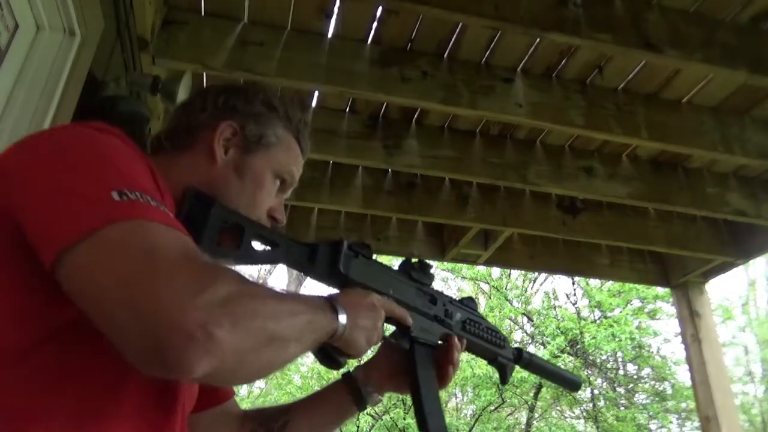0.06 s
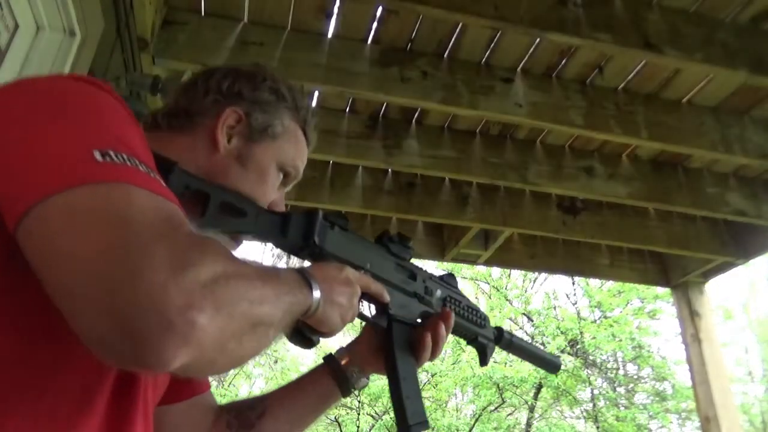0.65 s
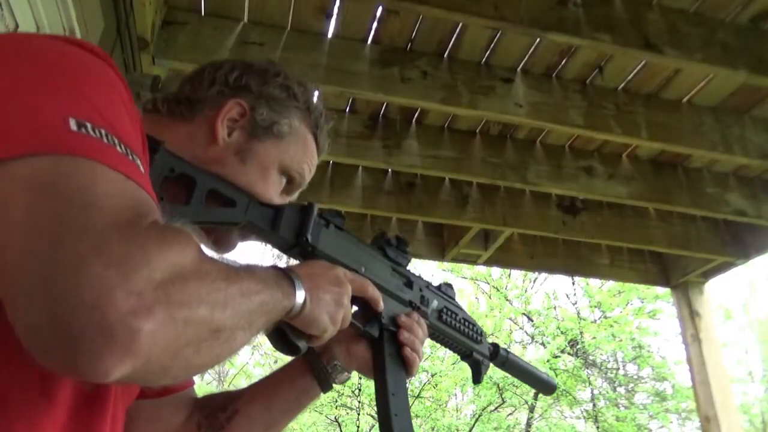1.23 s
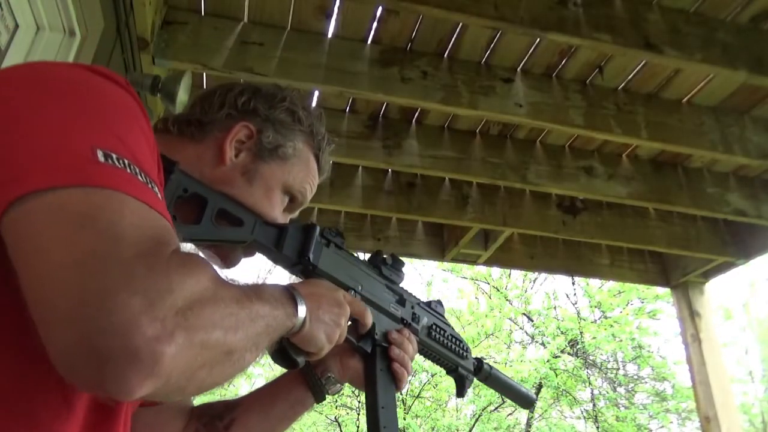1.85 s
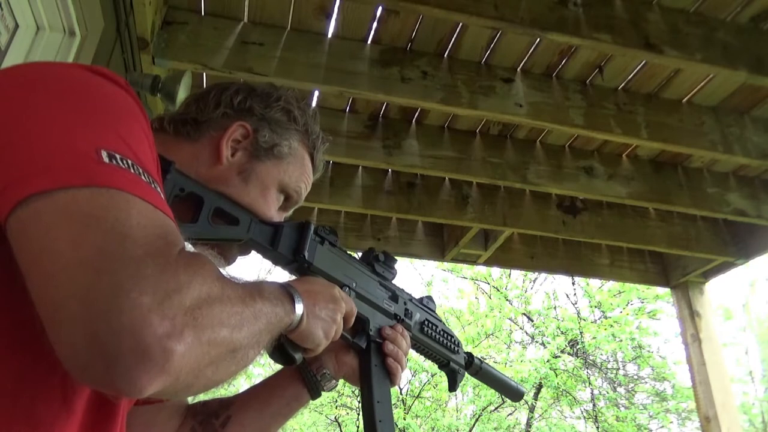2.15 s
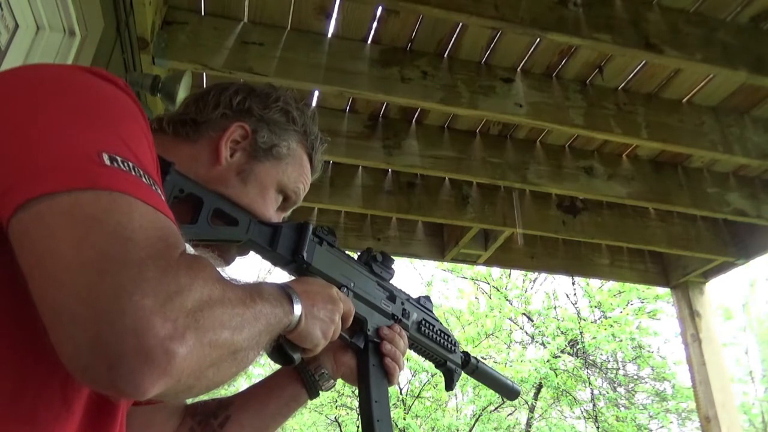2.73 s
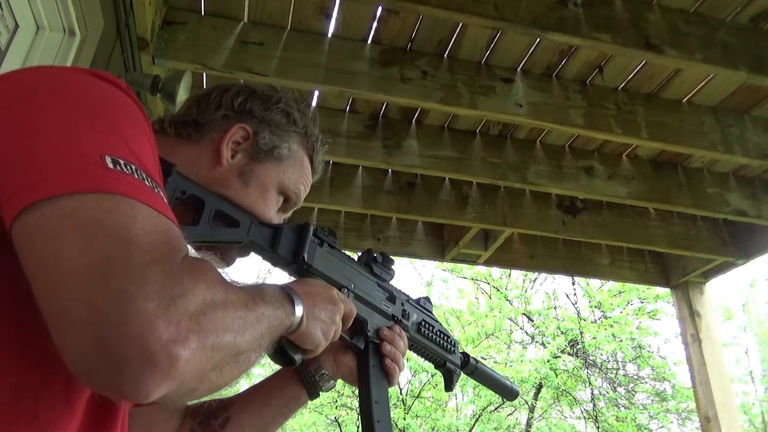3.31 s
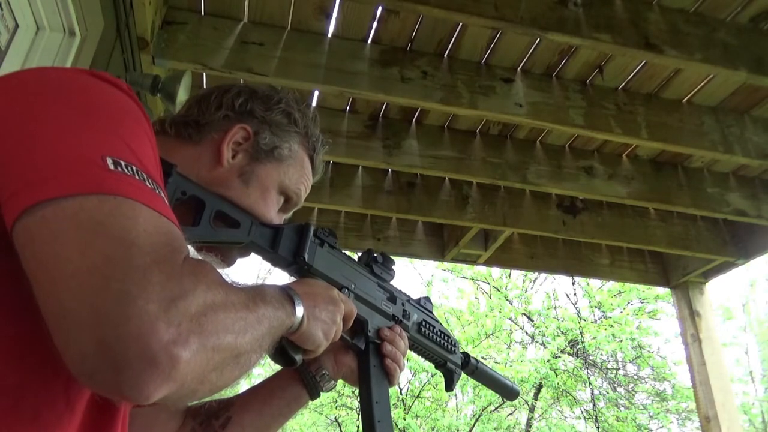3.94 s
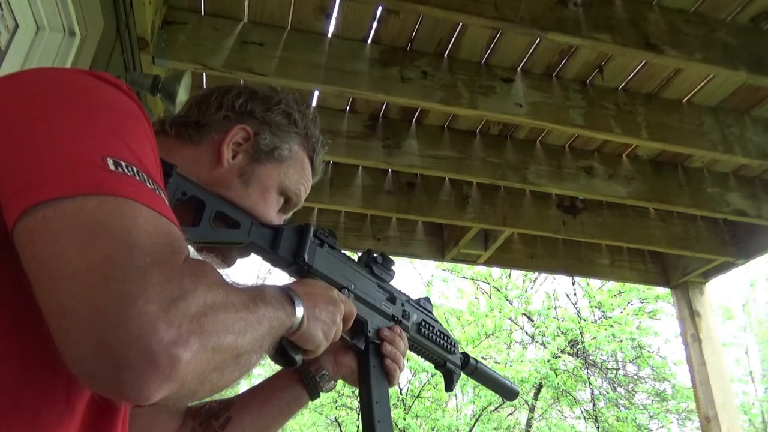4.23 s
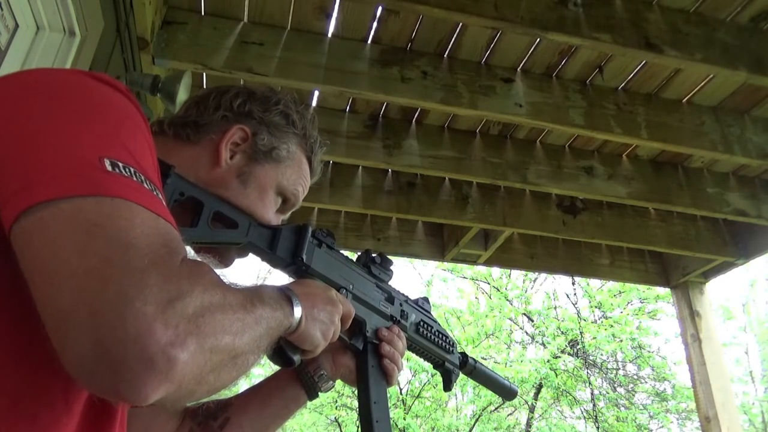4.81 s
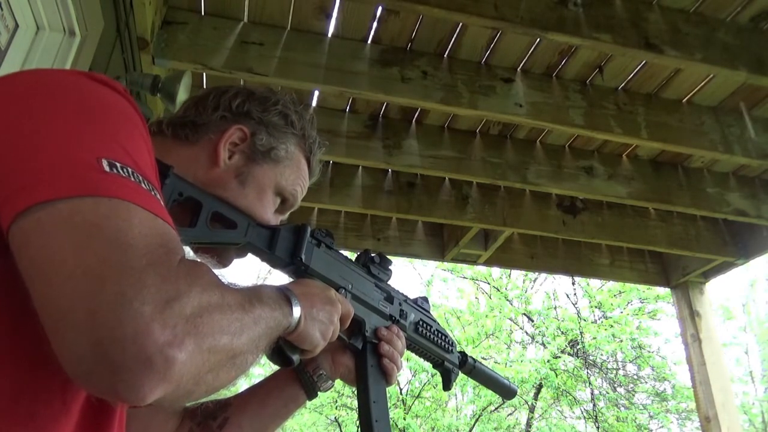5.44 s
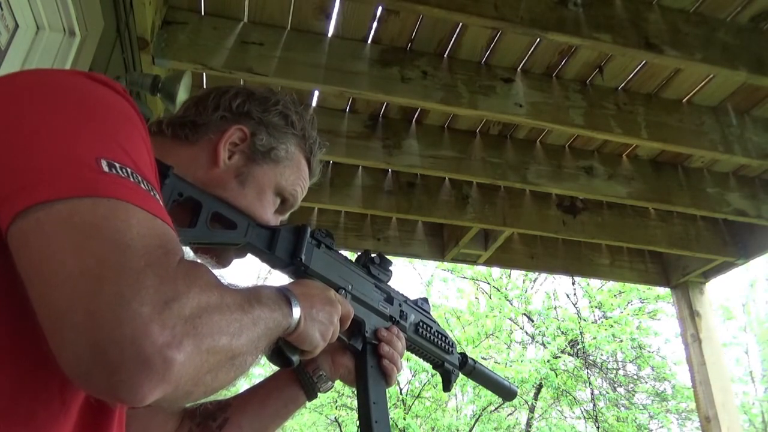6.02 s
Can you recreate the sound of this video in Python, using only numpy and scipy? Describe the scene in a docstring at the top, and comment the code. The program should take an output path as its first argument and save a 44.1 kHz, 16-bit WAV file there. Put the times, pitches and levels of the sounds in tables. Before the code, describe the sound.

Light rain falls steadily in woodland, an even hiss with a fine patter on leaves. Close to the microphone, under a wooden deck, drips tick, plop and splash at irregular moments. Early on, a small metal catch on a gun snaps shut once, with a very brief rattle and a short echo off the boards. The rain and dripping then carry on unchanged.

```python
"""Under a wooden deck in woodland, in steady light rain.
Far drops merge into an even hiss and nearer ones patter on leaves, over a very faint hum.
Close by, drips off the boards tick and plop, ring bubbles in puddles and burst into spray.
Once, a small metal catch snaps shut, rattles and echoes between the joists."""
import sys
import numpy as np
from scipy import signal
from scipy.fft import rfft, irfft, next_fast_len
from scipy.io import wavfile
from scipy.ndimage import uniform_filter1d

SR = 44100
rng = np.random.default_rng(int(sys.argv[2]) if len(sys.argv) > 2 else 0)


def persist_wave(psi):
    """Save psi, clipped to +-1, as 16-bit WAV."""
    counts = np.round(np.clip(psi, -1, 1) * 32767).astype(np.int16)
    wavfile.write(sys.argv[1], SR, np.atleast_2d(counts).T)


N = 272097
TIME = np.arange(N) / SR
SHORT = TIME[:SR // 5]   # 0.2 s, room for one small sound

# Close drips, from low plops to sharp ticks: start_s, ring_db, pitch_hz, ring_cycles, tick_db, spray_db
DRIPS = [(0.1121, -41, 2200, 2.5, -32, -43), (.174, -43, 720, 3.5, -55, -42),
         (.181, -43, 670, 3.5, -56, -51), (0.2599, -37, 4280, 6.7, -33, -52),
         (0.2606, -31.5, 7100, 21, -36, -42), (.2657, -40, 6700, 15, -46, -50),
         (.336, -44, 1700, 6, -41, -50), (0.374, -48, 11000, 3, -45, -48),
         (.407, -42.5, 1350, 9.8, -53, -43), (0.504, -46, 4000, 6, -46, -50),
         (0.6449, -36, 6560, 12, -34, -30.5), (.646, -38, 9500, 11, -32, -41),
         (.780, -42, 6150, 9, -43, -34.5), (.956, -46, 13000, 5, -47, -44), (1.046, -44, 8400, 8, -47, -46),
         (1.121, -45, 6600, 6.2, -38, -45), (1.133, -48, 11500, 4, -46, -50),
         (1.291, -38, 1020, 4, -48, -44), (1.297, -41, 2480, 7.8, -43, -35),
         (1.356, -32.5, 1250, 5.3, -42, -41), (1.3567, -42, 13500, 4, -47, -42),
         (1.361, -44, 740, 3.7, -55, -48), (1.476, -42, 850, 2.7, -57, -41),
         (1.591, -38.5, 664, 3, -54, -58), (2.012, -34.5, 1400, 13, -41, -48),
         (2.013, -40, 1930, 17, -43, -43), (2.269, -41.5, 2370, 16, -55, -36),
         (2.273, -42, 990, 2.2, -58, -48), (2.387, -52, 12000, 6, -54, -46),
         (2.814, -49, 11000, 6, -51, -37), (2.877, -45, 13500, 6, -52, -47),
         (3.012, -39.5, 2500, 14, -49, -31.5), (3.2505, -49, 780, 1.8, -53, -52),
         (3.251, -38, 1267, 65, -52, -45), (3.487, -39, 2500, 33, -56, -37.5),
         (3.722, -38, 2120, 7, -41, -40), (4.066, -41.5, 450, 7.3, -43, -46),
         (4.126, -37, 4640, 5.4, -40, -37.5), (4.361, -37, 3920, 1.1, -40, -40),
         (4.488, -42, 4900, 4.4, -54, -41), (4.958, -52, 12000, 6, -49, -41),
         (5.0525, -40, 830, 3, -49, -54), (5.0639, -34, 2970, 17, -50, -46),
         (5.076, -46, 2670, 24, -48, -36), (5.110, -46, 2400, 40, -51, -35.5),
         (5.1428, -43, 2640, 22, -48, -45), (5.150, -40.5, 2250, 34, -55, -43),
         (5.351, -44, 4320, 3, -47, -33), (5.445, -38.5, 850, 4, -55, -41),
         (5.560, -43, 2640, 11, -52, -33.5), (6.0484, -31, 3450, 3.2, -29, -32)]


def from_db(db):
    """Turn decibels into a gain."""
    return 10 ** (np.asarray(db) / 20)


def unit_level(x):
    """Scale a signal to an average (rms) level of 1."""
    return x / np.sqrt(np.mean(x ** 2) + 1e-20)


def burst(x, db):
    """Give a short sound the energy of ten milliseconds at this level."""
    return from_db(db) * x * np.sqrt(SR / 100 / (np.sum(x ** 2) + 1e-20))


def add(track, start_s, sound):
    """Mix a short sound into a track."""
    at = max(round(start_s * SR), 0)
    track[..., at:at + sound.shape[-1]] += sound[..., :N - at]


def resonate(x, hz, width_hz):
    """Let a sound ring at one pitch: the narrower the width, the longer the ring."""
    r = np.exp(-np.pi * width_hz / SR)
    feedback = [1, -(1 + r * r) * np.cos(2 * np.pi * hz / SR), r * r]
    return signal.lfilter(np.array([1, 0, -1]) * (1 - r * r) / 2, feedback, x + 1e-18)


def cut_lows(x, hz, order=2):
    """Weaken everything below this pitch."""
    return signal.sosfilt(signal.butter(order, hz, "high", fs=SR, output="sos"), x)


def coloured(noise, points):
    """Shape noise along a curve of (pitch_hz, level_db) points."""
    hz, db = np.transpose(points)
    size = next_fast_len(noise.shape[-1])
    bins_hz = np.maximum(np.arange(size // 2 + 1) * SR / size, 1)
    gain = from_db(np.interp(np.log(bins_hz), np.log(hz), db))
    return irfft(rfft(noise, size) * gain, size)[..., :noise.shape[-1]]


def diffuse(size):
    """Stereo noise arriving from all round."""
    # How strong the left-right difference is beside the shared part: pitch_hz, level_db
    stereo_width = [(30, -13), (60, -18), (150, -21), (350, -21.5), (700, -14), (1400, -8), (2800, -7.5),
                    (5600, -8.5), (9000, -11), (13000, -50)]
    shared, difference = rng.standard_normal((2, size))
    return shared + coloured(difference, stereo_width) * [[1], [-1]]


def wander(size):
    """A random drift of about 1 either way, smoothed over this many samples."""
    return unit_level(uniform_filter1d(uniform_filter1d(rng.standard_normal(N), size), size))


def crack(decay_s, edge=1):
    """A contact: a sharp edge with a brief crumble of noise behind it."""
    x = rng.standard_normal(len(SHORT)) * np.exp(-SHORT / decay_s)
    x[0] += edge * np.sqrt(np.sum(x ** 2))
    return x


def hum(waver_rad):
    """Two faint low tones that waver slightly."""
    # The tones of the hum: pitch_hz, level_db
    tones = [(55, -83), (164.5, -74.5)]
    return sum(from_db(db) * np.sqrt(2) * np.sin(2 * np.pi * hz * TIME + waver_rad * wander(SR // 40 * 10))
               for hz, db in tones)


def far_rain(flutter_db):
    """Countless far drops merge into a hiss whose level flutters a little."""
    # Tone colour of rain on far leaves and ground: pitch_hz, relative_db
    hiss_curve = [(25, -31), (45, -28), (75, -18), (110, -16.5), (200, -10.5), (295, -8), (340, -1),
                  (520, -2), (940, 1.47), (1300, -1.2), (2700, -3), (4400, -6.5), (7500, -7), (15000, -7.5)]
    hiss = unit_level(coloured(diffuse(N), hiss_curve))
    return hiss * from_db(flutter_db * wander(SR // 40))


def patter(per_s, spread_db, cycles, pan_db):
    """Drops hit nearer leaves, random in time, size and side; each rings for a few cycles."""
    out = np.zeros((2, N))
    pitches = np.geomspace(450, 10000, 16)
    drops_per_pitch = int(per_s * N / SR / len(pitches))
    for hz in pitches:
        when, chance, side, sign = rng.random((drops_per_pitch, 4)).T
        size = np.minimum(-np.log(chance), 4)   # many small drops, few big ones
        strength = from_db(spread_db * size) * np.sign(sign - .5)
        hits = np.zeros((2, N))
        hits[:, (when * N).astype(int)] = strength * from_db(pan_db * (side - .5) * [[1], [-1]])
        ringing = resonate(hits, hz, hz / cycles)
        out += unit_level(resonate(ringing, hz, hz))
    return unit_level(out)


def droplets(per_s, level_db, spread_db):
    """Tiny splashed droplets land close by as faint, high ticks."""
    out = np.zeros(N)
    for when, smallness in rng.random((int(per_s * N / SR), 2)):
        tick = resonate(crack(decay_s=0.0006), hz=15200, width_hz=4500)
        add(out, when * N / SR, burst(tick, level_db - spread_db * smallness))
    return out


def spray(grain_db, fizz_db, drip_core_db, drip_rise_s, splat_rise_s):
    """A drop bursts: a cloud of droplets swells and thins out, with a pitched core and a fine fizz."""
    # Drops that only burst into spray: start_s, level_db, pitch_hz, core_db
    splats = [(.165, -35, 8700, -7), (.426, -31.5, 2780, -5), (.501, -35.5, 4520, -5),
              (.773, -29.5, 5160, -8), (1.295, -36, 2600, -1), (2.55, -34.5, 4860, 7),
              (2.872, -32, 1300, -2), (3.017, -31, 1900, -8), (3.141, -30, 2400, 1),
              (3.318, -33.5, 3020, 14), (3.723, -36, 6800, -3), (3.973, -33, 2500, -2),
              (4.034, -34.5, 2600, 0), (4.262, -30, 3150, -12), (5.564, -27, 5000, 1),
              (5.950, -32.5, 5000, -12)]
    clouds = [(start_s, db, hz, drip_core_db, drip_rise_s) for start_s, _, hz, _, _, db in DRIPS]
    clouds += [(*splat, splat_rise_s) for splat in splats]
    out = np.zeros((2, N))
    for start_s, db, hz, core_db, rise_s in clouds:
        grains = from_db(grain_db * rng.standard_normal(len(SHORT)))
        cloud = diffuse(len(SHORT)) * grains * SHORT * np.exp(-SHORT / rise_s)
        core = from_db(core_db) * resonate(cloud, hz, 0.15 * hz)
        body = resonate(cloud, hz, 1.8 * hz) + core
        body = resonate(body, hz, 7.8 * hz)   # trims the far lows and highs
        fizz = from_db(fizz_db) * resonate(cloud, hz=6900, width_hz=15000)
        add(out, start_s, burst(body + fizz, db))
    return out


def plinks(attack_s, rise_per_s, wobble_cycles):
    """A trapped bubble rings as one tone that wobbles and creeps upward as it nears the surface."""
    # Drips that trap a bubble in a puddle: start_s, level_db, pitch_hz, decay_s
    bubbles = [(1.472, -40, 2554, 0.0098), (2.862, -44, 2650, .018), (4.036, -41.5, 2470, .005),
               (4.044, -49, 2770, .008), (5.364, -41, 1930, .005), (5.951, -37.5, 2590, .006)]
    out = np.zeros(N)
    for start_s, db, hz, decay_s in bubbles:
        cycles = hz * SHORT * (1 + rise_per_s * SHORT / 2)
        cycles += wobble_cycles * wander(SR // 500)[:len(SHORT)]
        envelope = (1 - np.exp(-SHORT / attack_s)) * np.exp(-SHORT / decay_s)
        add(out, start_s, burst(np.sin(2 * np.pi * cycles) * envelope, db))
    return out


def drips(attack_cycles, upper_ratio, upper_db, rough_db):
    """A drip strikes wood, a puddle or something hollow: a sharp tick, then two close tones ring."""
    out = np.zeros(N)
    tick = resonate(signal.unit_impulse(len(SHORT)), hz=10900, width_hz=8500)
    for start_s, ring_db, hz, ring_cycles, tick_db, _ in DRIPS:
        cycles = hz * SHORT
        tones = np.sin(2 * np.pi * cycles) + from_db(upper_db) * np.sin(2 * np.pi * cycles * upper_ratio)
        noise = rng.standard_normal(len(SHORT))
        rough = unit_level(resonate(resonate(noise, hz, hz / 2), hz, hz / 2))
        envelope = (1 - np.exp(-cycles / attack_cycles)) * np.exp(-np.pi * cycles / ring_cycles)
        ring = (tones + from_db(rough_db) * rough) * envelope
        add(out, start_s, burst(ring, ring_db) + burst(tick, tick_db))
    return out


def board_echoes(x, blur_s):
    """The first echoes of a close sound, slightly blurred by the rough boards."""
    # Bounces off the nearest boards: delay_s, level_db
    bounces = [(.0056, -13.5), (.0093, -27)]
    out = np.zeros(N)
    for delay_s, db in bounces:
        blur = crack(blur_s)
        blur /= np.sqrt(np.sum(blur ** 2))
        add(out, delay_s, from_db(db) * signal.fftconvolve(x, blur)[:N])
    return out


def deck_reverb(x, build_s, fade_s):
    """Sound bounces between boards and ground, building up quickly and falling 60 dB in fade_s."""
    t = TIME[:SR // 2]
    echoes = diffuse(len(t)) * from_db(-60 * t / fade_s) * (1 - np.exp(-t / build_s))
    echoes /= np.sqrt(np.sum(echoes ** 2) / 2)
    return signal.fftconvolve(x, echoes, axes=1)[:, :N]


def metal_catch(contact_s, scatter_db, scatter_rise_s, scatter_s, knock_db):
    """Each clack rings the metal, and a dense scatter of echoes comes back from the joists."""
    # The catch snaps shut and rattles on: start_s, level_db
    clacks = [(1.6595, -19.5), (1.6605, -29.5), (1.6650, -27), (1.6716, -25), (1.68, -22), (1.6889, -26),
              (1.7032, -29.5), (1.7108, -29.5)]
    # The tones the catch rings with: pitch_hz, width_hz, relative_db
    metal_tones = [(1586, 59, 0), (2500, 260, -5), (3130, 1100, -6.5), (4350, 900, -7.5), (5620, 1200, -4),
                   (6500, 1900, -7), (7740, 320, -4), (8180, 97, 6), (8430, 110, 3), (8520, 90, 1),
                   (8800, 560, 1), (9440, 300, -4), (11850, 3600, 0)]
    snap_s, lowest_hz = clacks[0][0], metal_tones[0][0]
    force = np.zeros((2, N))
    for start_s, db in clacks:
        contact = cut_lows(crack(contact_s, edge=0), hz=3040, order=1)   # small hard contacts sound thin
        add(force, start_s, burst(contact, db))
    scatter = (1 - np.exp(-SHORT / scatter_rise_s)) * np.exp(-(SHORT / scatter_s) ** 2)
    add(force, snap_s, burst(diffuse(len(SHORT)) * scatter, scatter_db))
    ringing = sum(from_db(db) * resonate(force, hz, width_hz) for hz, width_hz, db in metal_tones)
    out = unit_level(cut_lows(ringing, hz=1300)) * np.sqrt(np.mean(force ** 2))
    # the first blow also knocks the housing at its lowest tone
    knock = np.sin(2 * np.pi * lowest_hz * SHORT) * np.exp(-SHORT / 0.011)
    add(out, snap_s, burst(knock, knock_db))
    return out


def scene():
    """Rain all round; the close drips and the catch also echo under the deck."""
    leaves = from_db(-11.5) * patter(per_s=700, spread_db=4, cycles=4, pan_db=6)
    rain = from_db(-38.5) * (far_rain(flutter_db=1) + leaves)
    close = drips(attack_cycles=0.97, upper_ratio=1.058, upper_db=-4, rough_db=-4)
    close += plinks(attack_s=0.0012, rise_per_s=1.2, wobble_cycles=0.16)
    close += board_echoes(close, blur_s=0.00096)
    splashes = spray(grain_db=3, fizz_db=-4, drip_core_db=5, drip_rise_s=0.0045, splat_rise_s=0.011)
    close = close + from_db(1.5) * splashes
    close += droplets(per_s=24, level_db=-39.5, spread_db=10)
    close += metal_catch(contact_s=0.0015, scatter_db=-16, scatter_rise_s=0.005, scatter_s=0.072,
                         knock_db=-34.5)
    close = cut_lows(close, hz=248)   # the close sounds carry no deep thump
    reverb = from_db(-5.5) * deck_reverb(close, build_s=0.004, fade_s=0.17)
    mix = rain + close + reverb + hum(waver_rad=0.77)
    return mix * from_db([[-0.22], [0.22]])   # a little stronger on the right


def record(dry):
    """Small microphones with a treble peak, falling away above it."""
    bright = dry + from_db(-3) * resonate(dry, hz=8780, width_hz=2150)
    dulled = signal.sosfilt(signal.butter(3, 8660, fs=SR, output="sos"), bright)
    steep_top_cut = signal.ellip(10, .1, 80, 15900, fs=SR, output="sos")
    return signal.sosfilt(steep_top_cut, dulled)


dry = scene()
out = record(dry)
persist_wave(out)
```